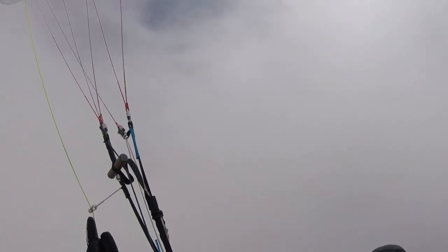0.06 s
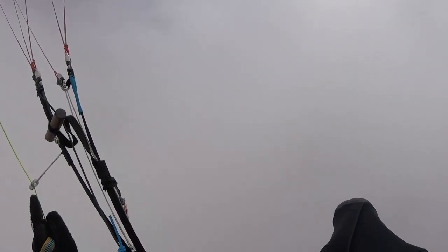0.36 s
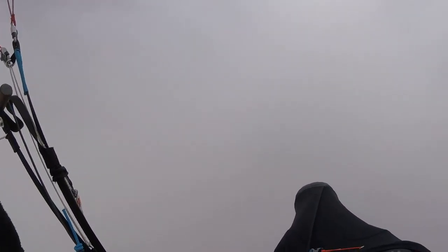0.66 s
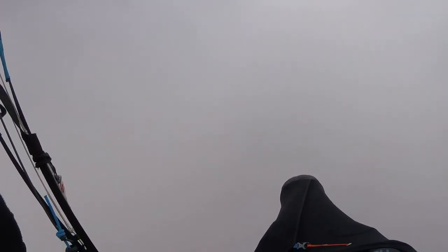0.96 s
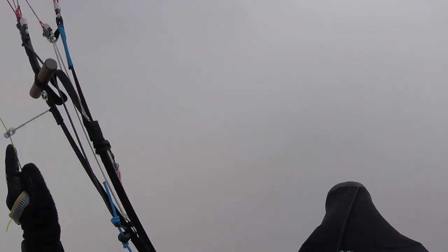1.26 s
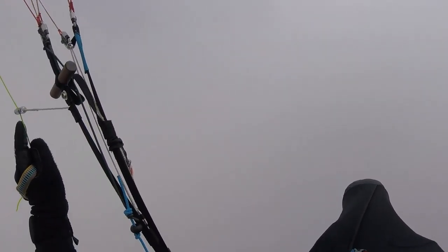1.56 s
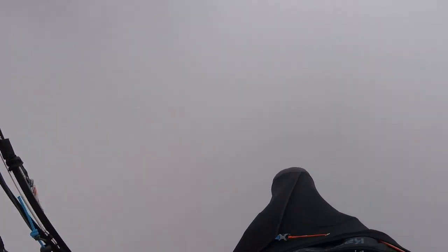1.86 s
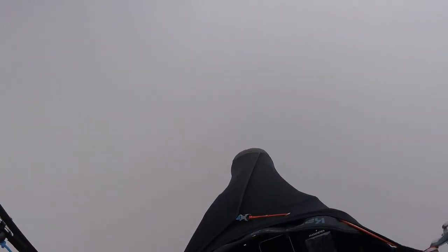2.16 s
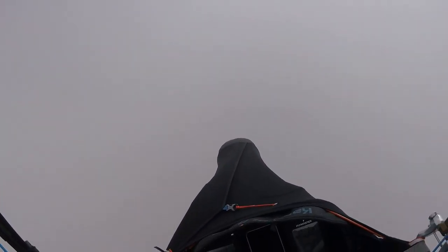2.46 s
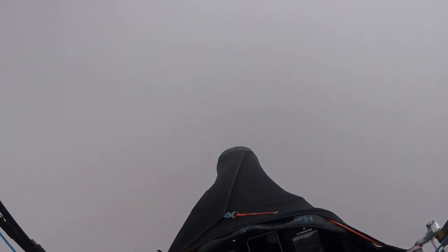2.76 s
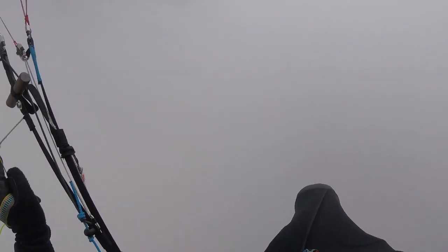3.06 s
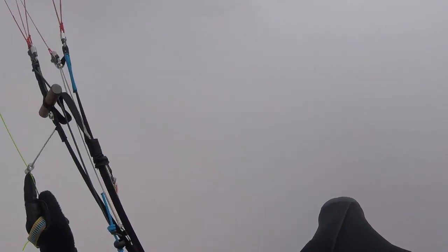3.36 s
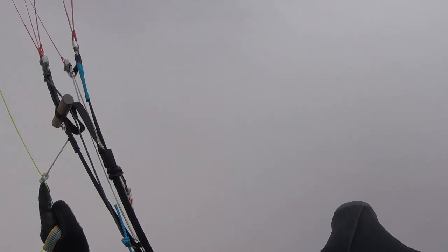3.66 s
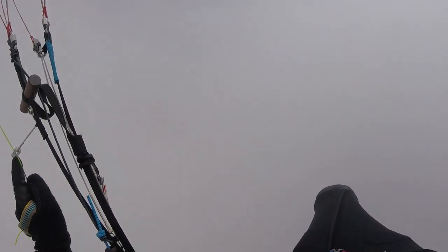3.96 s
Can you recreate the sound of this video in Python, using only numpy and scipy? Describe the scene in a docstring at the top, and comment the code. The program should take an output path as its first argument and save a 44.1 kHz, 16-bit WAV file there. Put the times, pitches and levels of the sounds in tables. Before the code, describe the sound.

Wind buffets the microphone throughout with a deep, uneven rumble and soft thumps over a faint airy hiss. The rush of air swells gently from about 0.5 to 1 second. It builds again near 1.8 seconds into a rough, tearing gust with small crackles, strongest from 2.2 to 2.7 seconds. By 3 seconds it eases back to low rumbling, with a heavier thump around 3.7 seconds.

```python
"""Wind on a paraglider's camera microphone.

Eddies rumble and thump at the port over a steady rush of air. As the camera turns into the flow the
rush swells, once gently and then into a rough, tearing gust. Thin hiss and one faint cloth rustle lie
behind. A fast limiter holds the bass down."""
import sys
import numpy as np
from scipy import signal
from scipy.fft import rfft, irfft
from scipy.io import wavfile
from scipy.ndimage import uniform_filter1d, minimum_filter1d

SR = 44100
rng = np.random.default_rng(int(sys.argv[2]) if len(sys.argv) > 2 else 0)


def transcribe(signal):
    """Save signal, clipped to [-1, 1], as a 16-bit WAV file at the path in sys.argv[1]."""
    frames = np.atleast_2d(signal).T
    limited = np.clip(frames, -1, 1)
    pcm = np.round(limited * 32767).astype(np.int16)
    wavfile.write(sys.argv[1], SR, pcm)


N = 176400
TIME_S = np.arange(N) / SR
FREQ_HZ = np.fft.rfftfreq(N, 1 / SR)

# Envelopes: port flow, rumble, buffeting, harness hiss. Each row: time in seconds, level in dB.
FLOW_LEVEL = [(0, -42.5), (.48, -42.5), (.58, -37), (.76, -33), (.99, -35), (1.05, -40), (1.2, -43.5),
              (1.38, -40.5), (1.6, -44), (1.785, -43.5), (1.83, -37), (1.86, -33), (1.92, -32), (2.11, -34),
              (2.18, -29.5), (2.235, -29.5), (2.3, -22.5), (2.39, -23.5), (2.5, -24.5), (2.6, -29.5),
              (2.7, -35.5), (2.75, -34.5), (2.85, -33), (3.02, -37), (3.15, -41.5), (3.45, -43.5),
              (3.86, -44), (4, -39)]
RUMBLE_LEVEL = [(0, -17.5), (.1, -9.5), (.145, -19.5), (.2, -11), (.45, -12.5), (.52, -16), (.93, -12.5),
                (1.01, -15), (1.12, -12.5), (1.5, -14), (1.7, -10.5), (1.8, -13.5), (2.22, -13),
                (2.42, -18.5), (2.54, -8), (2.7, -17), (2.92, -13), (3.02, -15), (3.5, -17), (3.72, -12.5),
                (4, -15)]
BUFFET_LEVEL = [(0, -22), (.12, -27.5), (.25, -22.5), (.65, -29), (.95, -22), (1.15, -27.5), (1.27, -22.5),
                (1.55, -25), (1.95, -24), (2.14, -15.5), (2.42, -15), (2.62, -12), (2.8, -19.5),
                (3.1, -30.5), (3.5, -32), (3.62, -25.5), (4, -24.5)]
HISS_LEVEL = [(.2, -53.5), (.5, -55), (.9, -49), (1.2, -54.5), (1.4, -51), (1.7, -54), (1.95, -48.5),
              (2.18, -44), (2.36, -47.5), (2.5, -49.5), (2.85, -46.5), (3.15, -49.5), (3.4, -53.5),
              (3.85, -53.5), (3.95, -51)]
# Lulls in the eddies. Each row: centre in seconds, depth in dB.
LULLS = [(0.146, 4), (.7, 2), (1.009, 4.5), (1.554, 6.5), (1.789, 7.5), (2.64, 5.5), (2.992, 7), (3.155, 8),
         (3.42, 4.5), (3.52, 5.5)]
# Eddy strikes and breakaway snaps. Each row: centre in seconds, envelope peak in dB, pitch in Hz.
THUMPS = [(.295, -13, 195), (.471, -13.5, 235), (.955, -11.5, 218), (1.041, -12, 170), (1.26, -8, 155),
          (1.32, -8.5, 160), (1.604, -12.5, 170), (1.769, -9, 292), (1.816, -6, 206), (1.865, -12, 216),
          (2.077, -11.5, 266), (2.197, -11, 322), (2.276, -10, 283), (2.304, -11, 304), (2.42, -8, 300),
          (2.502, -11, 280), (2.604, -12, 367), (2.616, -13, 280), (2.664, -10.5, 320), (2.694, -6, 426),
          (2.811, -8.5, 206), (3.189, -10.5, 181), (3.357, -14, 260), (3.676, -3, 162), (3.884, -11, 288),
          (3.984, -8, 197)]
SNAPS = [(.72, -27, 1800), (2.153, -20, 1900), (2.162, -29, 2700), (2.194, -14, 900), (2.2104, -10, 1400),
         (2.3067, -18, 1500), (2.353, -14, 1200), (2.4523, -14, 1000), (2.6035, -12, 850),
         (2.6687, -18, 1700), (2.6812, -33, 3600), (2.694, -9.5, 850)]
# Flow tearing off the housing. Each row: peak time and rise in seconds, body and spit levels in dB.
TEARS = [(2.164, .006, -33, -44), (2.181, .008, -24, -50), (2.195, .002, -16, -39), (2.203, .004, -16, -37),
         (2.209, .003, -18, -38), (2.306, .012, -26, -46), (2.353, .004, -20, -40), (2.368, .01, -23, -37),
         (2.383, .009, -21, -39), (2.453, .005, -20, -48), (2.575, .007, -26, -46), (2.6, .004, -20, -48),
         (2.668, .008, -23, -43), (2.681, .005, -26, -44), (2.694, .008, -19, -48),
         (2.716, .016, -21.5, -52)]
# Weak housing resonances. Each row: centre in Hz, width in Hz, lift in dB.
HOUSING_MODES = [(596, 26, 3.5), (753, 38, 3.5), (927, 20, 3.5), (1475, 22, 4), (1690, 24, 5),
                 (2090, 45, 3.5), (2492, 38, 3)]
# Noise spectra. Each row: frequency in Hz, relative density in dB.
RUMBLE_SPECTRUM = [(5, -18), (12, -12), (25, 2), (42, 1.5), (100, -1.5), (150, -7.5), (220, -22),
                   (400, -66.5), (900, -83.5)]
BUFFET_SPECTRUM = [(50, -37), (110, 0), (170, 0), (240, -2.5), (320, -9.5), (440, -17), (700, -32.5),
                   (1500, -58), (4000, -91)]
RUSH_SPECTRUM = [(100, -19.5), (330, -1.5), (480, 1.2), (620, -0.5), (780, -1.5), (1100, -2.5),
                 (1400, -6.5), (1900, -13.5), (2450, -18.5), (3100, -26), (3900, -40.5), (5200, -41),
                 (7000, -61), (12000, -76)]
TEAR_SPECTRUM = [(100, -5), (330, 4), (700, 4), (1100, -4), (2000, -16), (3000, -25), (4000, -37),
                 (6000, -47), (12000, -72)]
SPIT_SPECTRUM = [(600, -25), (1500, 3), (2700, 5.5), (3600, -7.5), (5000, -12.5), (7000, -29.5),
                 (12000, -48.5)]
HISS_SPECTRUM = [(500, -1.5), (2000, 4.5), (2900, 2.5), (3900, -4.5), (5100, -9.5), (6100, -16.5),
                 (8000, -36.5), (14000, -45.5)]
FLOOR_SPECTRUM = [(1000, 1), (5000, -1.5), (5900, -3.5), (6700, 1), (8500, -1.5), (10500, -5.5),
                  (11700, -10), (13200, -11.5), (15000, -22.5)]
RUSTLE_SPECTRUM = [(2500, -10), (4600, 0), (8500, -6), (14000, -17)]


def amp(db):
    """Decibels to gain."""
    return 10 ** (np.asarray(db) / 20)


def unit_rms(x):
    """Scales to rms 1."""
    return x / np.sqrt(np.mean(x ** 2) + 1e-20)


def envelope(points):
    """Gain over time from a level table."""
    return amp(np.interp(TIME_S, *np.transpose(points)))


def coloured(x, spectrum, lift_db=0):
    """Filters x by a spectrum table; rms 1."""
    hz, db = np.transpose(spectrum)
    response_db = np.interp(np.log(FREQ_HZ + 1), np.log(hz), db) + lift_db
    return unit_rms(irfft(rfft(x) * amp(response_db), N))


def flutter(slow_hz, fast_hz, depth_db):
    """Random gain wavering between two rates; rms 1."""
    band = FREQ_HZ / (FREQ_HZ + slow_hz) ** 1.5 / (1 + (FREQ_HZ / fast_hz) ** 4)
    waver = unit_rms(irfft(rfft(rng.standard_normal(N)) * band, N))
    return unit_rms(amp(depth_db * waver))


def steadied(x, span_s):
    """Flattens slow swells, keeps quick lumps."""
    size = int(span_s * SR)
    power = uniform_filter1d(uniform_filter1d(x ** 2, size), size)
    return x / np.sqrt(power + 1e-9)


def pressure_pulses(rows, decay_cycles, phases_turns):
    """One short cosine pulse per row, fading on both sides."""
    out = np.zeros(N)
    for (centre_s, db, hz), phase in zip(rows, phases_turns):
        near = slice(*np.searchsorted(TIME_S, [centre_s - 10 / hz, centre_s + 10 / hz]))
        cycles = (TIME_S[near] - centre_s) * hz
        window = np.exp(1 - np.hypot(cycles / decay_cycles, 1))
        out[near] += amp(db) * window * np.cos(2 * np.pi * (cycles + phase))
    return out


def housing_lift_db():
    """Resonant lift of the housing per frequency."""
    return sum(db / (1 + (2 * (FREQ_HZ - hz) / width_hz) ** 2) for hz, width_hz, db in HOUSING_MODES)


def rumble():
    """Large eddies push on the diaphragm."""
    eddies = coloured(rng.standard_normal(N), RUMBLE_SPECTRUM)
    return envelope(RUMBLE_LEVEL) * steadied(eddies, span_s=.07)


def buffet(calm_speed=.94, speed_exponent=.09):
    """Smaller eddies arrive in clumps; stronger flow carries them faster, raising the pitch."""
    clumps = rng.standard_normal(N) * flutter(slow_hz=24, fast_hz=70, depth_db=3)
    flow = envelope(FLOW_LEVEL)
    travel_samples = np.cumsum(calm_speed * (flow / flow.min()) ** speed_exponent)
    eddies = np.interp(travel_samples % N, np.arange(N), coloured(clumps, BUFFET_SPECTRUM))
    return envelope(BUFFET_LEVEL) * steadied(eddies, span_s=.1)


def lull_gain(half_width_s=.015):
    """The eddies dip as the air briefly calms."""
    dip_db = sum(db * np.exp(-((TIME_S - centre_s) / half_width_s) ** 2) for centre_s, db in LULLS)
    return amp(-dip_db)


def thumps():
    """Single eddies strike the port."""
    return pressure_pulses(THUMPS, decay_cycles=.4, phases_turns=rng.random(len(THUMPS)))


def rush():
    """Air rushes over the port; stronger flow sputters more."""
    flow = envelope(FLOW_LEVEL)
    roughness = flow / flow.max()
    smooth = rng.standard_normal(N) * flutter(slow_hz=25, fast_hz=140, depth_db=.8)
    sputter = rng.standard_normal(N) * flutter(slow_hz=44.4, fast_hz=252, depth_db=3.7)
    air = np.sqrt(1 - roughness) * smooth + np.sqrt(roughness) * sputter
    return flow * coloured(air, RUSH_SPECTRUM, housing_lift_db())


def tears(fall_s=.0025):
    """Flow tears off the housing in ragged bursts: dull body, sharp spit."""
    body_gain, spit_gain = np.zeros((2, N))
    for peak_s, rise_s, body_db, spit_db in TEARS:
        time_constants = np.maximum((peak_s - TIME_S) / rise_s, (TIME_S - peak_s) / fall_s)
        burst = np.exp(-np.minimum(time_constants, 20))
        body_gain += amp(body_db) * burst
        spit_gain += amp(spit_db) * burst
    crackle = rng.standard_normal((2, N)) * flutter(slow_hz=300, fast_hz=700, depth_db=1.6)
    body = coloured(crackle[0], TEAR_SPECTRUM, housing_lift_db())
    spit = coloured(crackle[1], SPIT_SPECTRUM)
    return body_gain * body + spit_gain * spit


def snaps():
    """Flow breaks away from the port in thin pressure spikes."""
    return pressure_pulses(SNAPS, decay_cycles=.18, phases_turns=np.zeros(len(SNAPS)))


def harness_hiss():
    """Air hisses thinly past the harness."""
    air = coloured(rng.standard_normal(N), HISS_SPECTRUM)
    return envelope(HISS_LEVEL) * air * flutter(slow_hz=13, fast_hz=120, depth_db=1)


def noise_floor(level_db=-61.5):
    """Even self-noise of the microphone."""
    return amp(level_db) * coloured(rng.standard_normal(N), FLOOR_SPECTRUM)


def cloth_rustle(centre_s=.125, half_width_s=.08, level_db=-61):
    """Cloth shifts briefly near the camera."""
    grains = rng.standard_normal(N) * flutter(slow_hz=60, fast_hz=300, depth_db=2)
    window = np.exp(-((TIME_S - centre_s) / half_width_s) ** 4)
    return amp(level_db) * window * coloured(grains, RUSTLE_SPECTRUM)


def scene(fade_s=.004):
    """Mono sum, faded in and out."""
    eddies = lull_gain() * (rumble() + buffet())
    wind = eddies + thumps() + rush() + tears() + snaps()
    background = harness_hiss() + noise_floor() + cloth_rustle()
    to_edge_s = np.minimum(TIME_S, TIME_S[::-1])
    fade = np.sin(np.pi / 2 * np.minimum(to_edge_s / fade_s, 1)) ** 2
    return (fade * (wind + background))[None]


def record(dry, bass_hz=450, ceiling_db=-4, hold_s=.011, cutoff_hz=15300):
    """Fast bass limiter, then a low-pass."""
    bass = signal.sosfiltfilt(signal.butter(2, bass_hz, fs=SR, output="sos"), dry[0])
    size = int(hold_s * SR)
    needed_gain = np.minimum(1, amp(ceiling_db) / (abs(bass) + 1e-9))
    held_gain = minimum_filter1d(needed_gain, size)
    smooth_gain = uniform_filter1d(uniform_filter1d(held_gain, size // 2), size // 2)
    limited = dry + bass * (smooth_gain - 1)
    lowpass = signal.firwin(511, cutoff_hz, window=("kaiser", 9), fs=SR)
    return signal.oaconvolve(limited, lowpass[None], "same")


dry = scene()
out = record(dry)
transcribe(out)
```